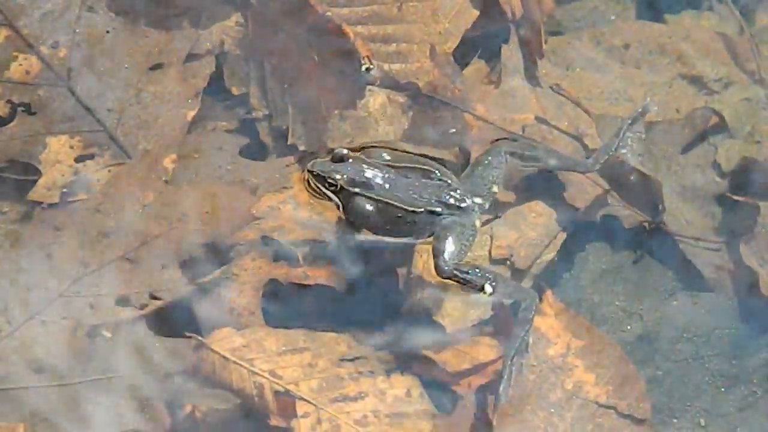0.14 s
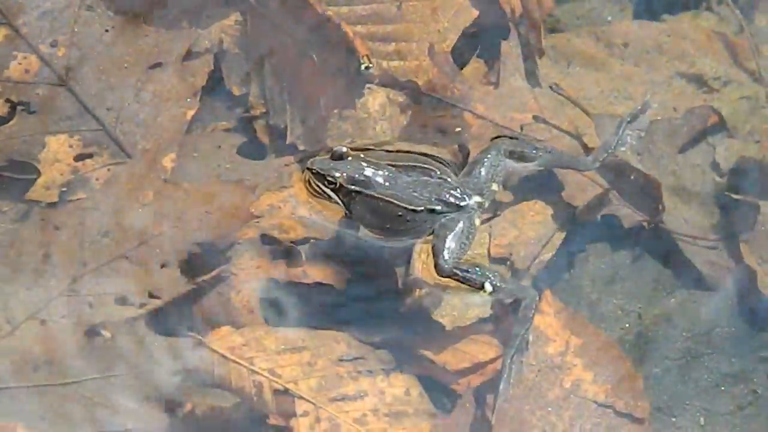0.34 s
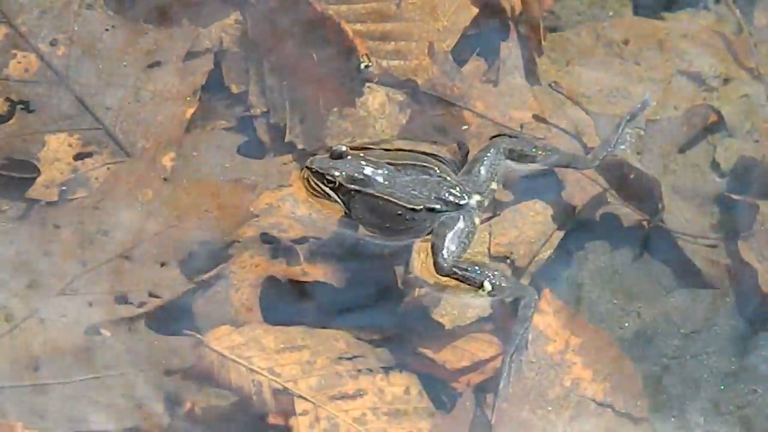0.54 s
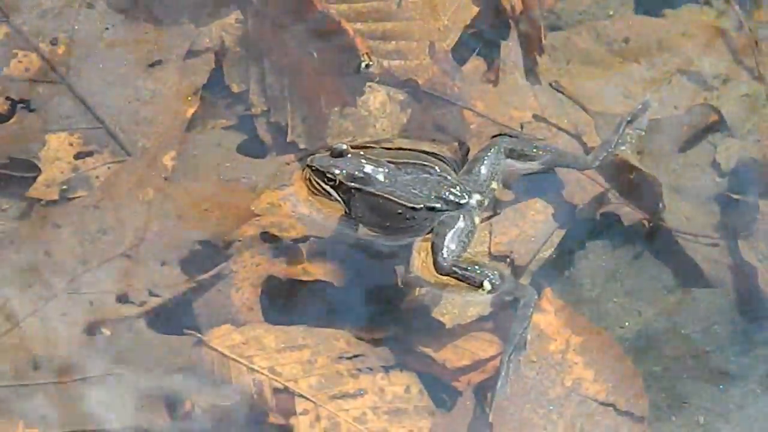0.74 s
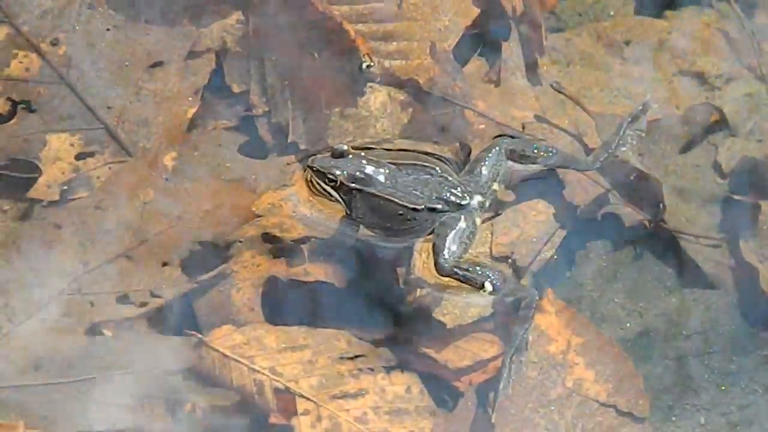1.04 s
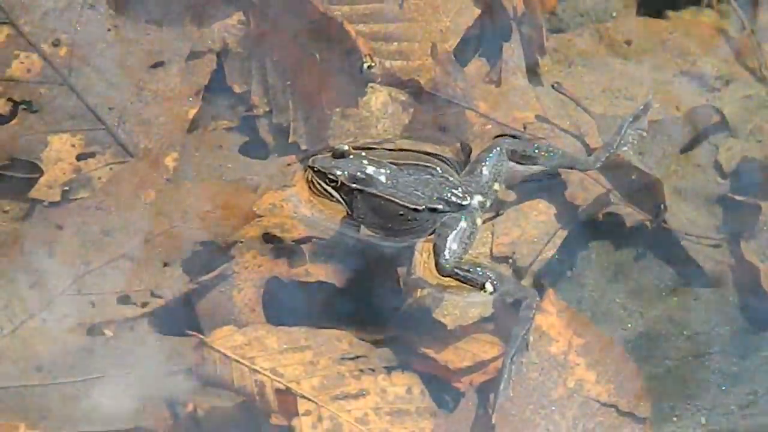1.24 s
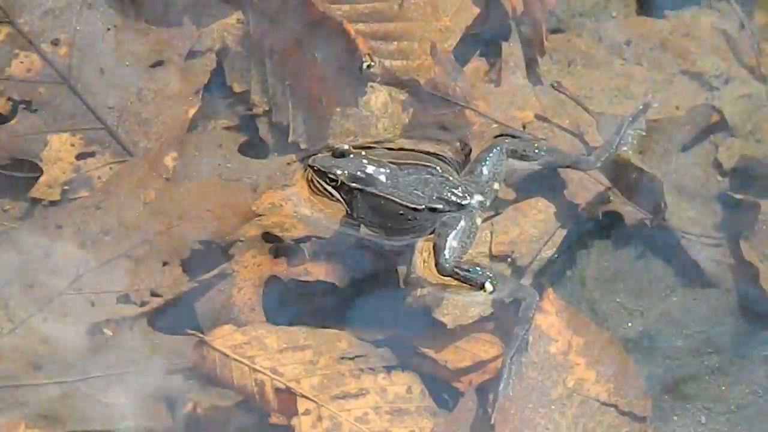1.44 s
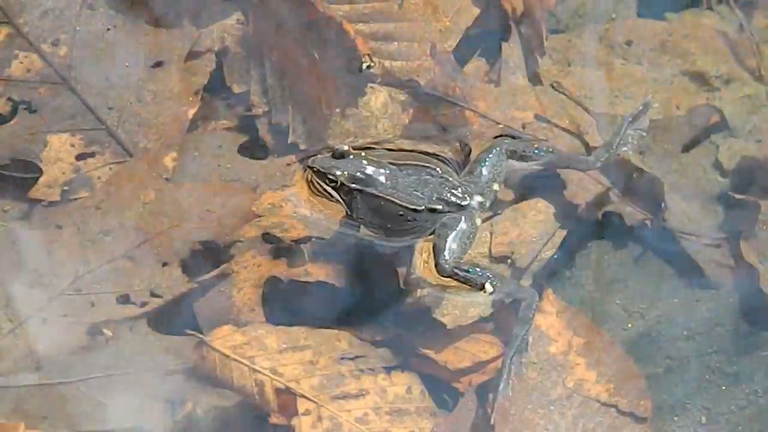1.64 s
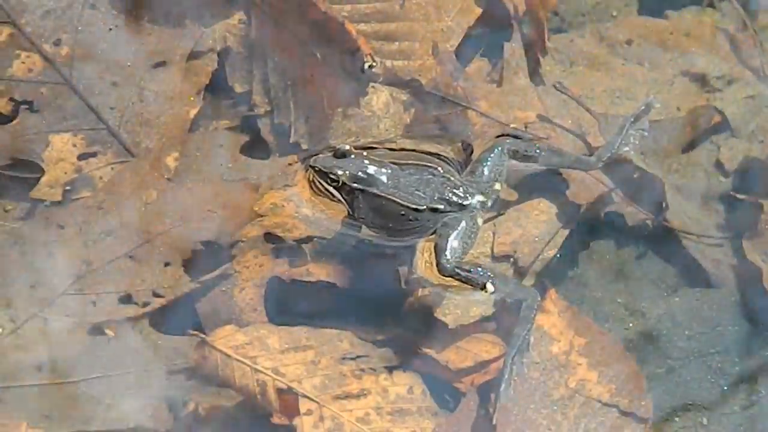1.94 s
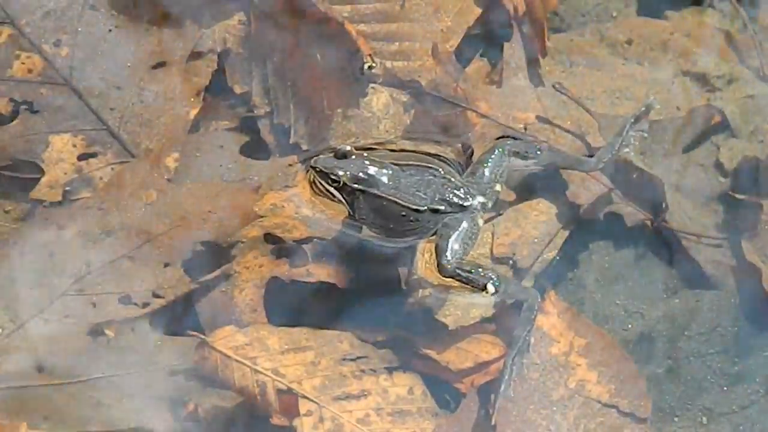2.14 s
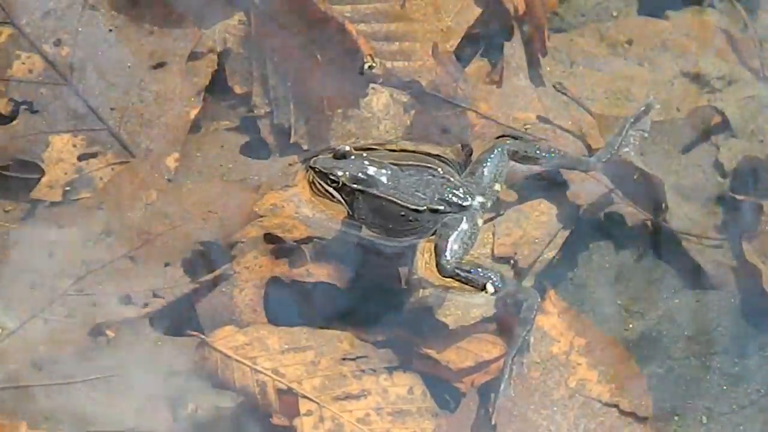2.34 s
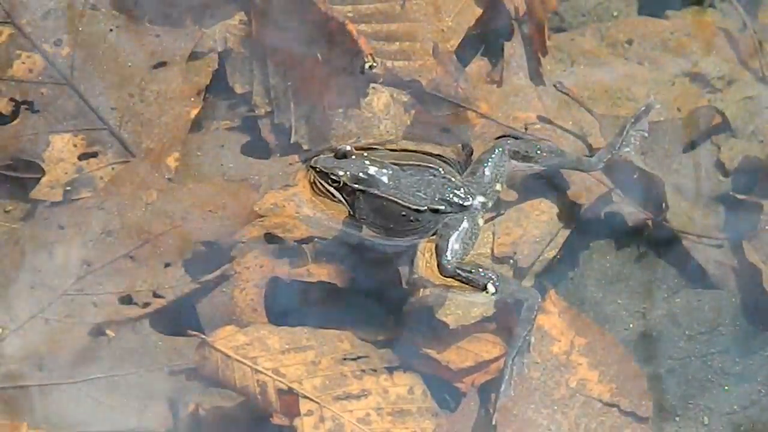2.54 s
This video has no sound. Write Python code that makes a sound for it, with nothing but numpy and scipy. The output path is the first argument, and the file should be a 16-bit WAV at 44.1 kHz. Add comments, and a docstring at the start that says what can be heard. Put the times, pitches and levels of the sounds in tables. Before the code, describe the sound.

Wood frogs quacking in short overlapping notes at a pond, with faint high peeps.

```python
"""A woodland pond. From the start, over a low rumble and faint hiss, wood frogs quack in short overlapping
notes, each a burst of larynx pulses ringing the body and vocal sacs, with a distant chorus behind them.
Spring peepers soon join with thin rising whistles; from about one second in, a few smooth whines slip
between the quacks. Every call echoes off water and trees, and the loudest clip the hotter right channel."""
import sys
import numpy as np
from scipy import signal
from scipy.fft import rfft, irfft, next_fast_len
from scipy.io import wavfile

SR = 44100
rng = np.random.default_rng(int(sys.argv[2]) if len(sys.argv) > 2 else 0)


def wav_out(sig):
    """Save sig, one row per channel (or a flat mono array), as 16-bit PCM at SR to the path in sys.argv[1]."""
    wavfile.write(sys.argv[1], SR, np.round(np.clip(np.atleast_2d(sig).T, -1, 1) * 32767).astype(np.int16))


N = 118629
LEAD = 4410  # samples of pre-roll, for notes already sounding at the start


def gain_of(db):
    return 10 ** (np.asarray(db) / 20)


def unit_rms(x):
    return x / np.sqrt(np.mean(x ** 2) + 1e-20)


def eq_gain(curve, hz):
    """Gain of a (Hz, dB) curve, drawn on a log frequency axis."""
    curve_hz, db = np.transpose(curve)
    return gain_of(np.interp(np.log(hz + 1), np.log(curve_hz + 1), db))


def equalise(x, curve):
    size = next_fast_len(x.shape[-1] + 4096)
    gain = eq_gain(curve, np.fft.rfftfreq(size, 1 / SR))
    return irfft(rfft(x, size) * gain, size)[..., :x.shape[-1]]


def fader(points):
    return gain_of(np.interp(np.arange(N) / SR, *np.transpose(points)))


def place(mix, start, sound, left_db):
    """Pans a sound into a stereo mix that begins LEAD samples early."""
    part = mix[:, max(round(start * SR) + LEAD, 0):][:, :len(sound)]
    part += gain_of([[left_db / 2], [-left_db / 2]]) * sound[:part.shape[1]]


def rumble():
    """Low distant rumble thinning into hiss, mostly alike in both channels."""
    # Each row: frequency in Hz, relative noise density in dB.
    spectrum = [(20, -28.5), (45, -12.5), (80, 1.5), (140, -5), (200, -8), (330, -12.5), (500, -14.5),
                (1500, -29.5), (5000, -28), (7000, -45), (11000, -45), (15800, -52)]
    # Each row: time in seconds, level in dB.
    level_ride = [(0.0, -29), (0.04, -56.5), (0.46, -47), (1.13, -37.5), (1.16, -41.5), (2.03, -43),
                  (2.1, -50), (2.14, -46), (2.63, -43.5), (2.69, -41.5)]
    common, apart = rng.standard_normal((2, N))
    noise = np.array([common, .8 * common + .6 * apart])
    return unit_rms(equalise(noise, spectrum)) * fader(level_ride)


def larynx(size, rate, bend, dice, jitter=.05, uneven_db=1.6):
    """Pulses uneven in timing and strength, their rate sliding up or down through the note."""
    slide = .18 * np.tanh(bend)
    at = (np.arange(60) + .5 + jitter * dice[0, :60]) * SR / rate
    at = np.round(at * (1 - slide * np.minimum(at / size, 1) / 2)).astype(int)
    return np.bincount(np.clip(at, 0, size), gain_of(uneven_db * dice[1, :60]), size + 1)[:size]


def ring(x, hz, width_hz):
    """A resonance applied twice for steep skirts, at unit RMS."""
    radius = np.exp(-np.pi * 1.5 * width_hz / SR)
    poles = [1, -2 * radius * np.cos(2 * np.pi * hz / SR), radius ** 2]
    return unit_rms(signal.lfilter([1, 0, -1], poles, signal.lfilter([1], poles, x)))


def quack(mix, start, core, level_db, rate, sac_hz, body_db, upper_db, treble_db):
    """Larynx pulses, each with a puff of noise, swell and fade as they ring the vocal sacs and body."""
    stretch, rise = 1.35, .3  # note length over its core; share of the note spent rising
    dice = rng.standard_normal((4, 8000))
    quirk = dice[3]
    detune = 1 + .05 * quirk
    t = np.arange(0, stretch * core + .02, 1 / SR)
    progress = np.clip(t / (stretch * core), 0, 1)
    swell = np.sin(np.pi / 2 * np.minimum(progress / rise, (1 - progress) / (1 - rise)))
    caller = larynx(len(t), rate, quirk[6], dice)
    partner = larynx(len(t), 1.6 * rate * detune[7] ** 3, quirk[8], dice[:, 60:])  # a second, faster frog
    pulses = swell * (caller + gain_of(-6.5) * partner)
    puff_shape = signal.lfilter([1], [1, -np.exp(-1 / (.0026 * SR))], pulses)
    puffs = unit_rms(puff_shape * dice[2, :len(t)])
    drive = unit_rms(pulses) + .22 * puffs
    sac = ring(drive, sac_hz, width_hz=274)
    low_sac = gain_of(-9.5) * ring(drive, .82 * sac_hz * detune[0], 274)
    body = gain_of(body_db) * ring(drive, 769.4 * detune[1], 197)
    upper = gain_of(upper_db) * ring(drive, 2486 * detune[2], 1140)
    treble = gain_of(treble_db) * ring(drive + .83 * puffs, 4830 * detune[3], 800)
    rasp = gain_of(-34) * puffs
    voice = unit_rms(sac - low_sac) + body - upper + rasp
    onset = start - (stretch - 1) * core * .4
    left_db = 1.97 * quirk[5]
    level = gain_of(level_db) * np.sqrt(np.mean(swell ** 2))
    place(mix, onset, level * voice, left_db)
    place(mix, onset + .00019, level * treble, left_db + 18.5)  # the bright edge sits far left


def near_frogs():
    """The foreground quacks of the wood frogs."""
    # Each row: start and length of the note's core in seconds, relative level in dB, pulses per second,
    # sac resonance in Hz, then body, upper and treble resonances in dB against the sac.
    notes = [(-0.006, 0.032, -6.5, 190.0, 1717, -11.5, -16, -32),
             (0.051, 0.022, -28.5, 230, 1560, -20, -18, -22.5),
             (0.073, 0.029, -23.0, 177.0, 1600, -11.5, -19, -44),
             (0.168, 0.044, -27, 160.0, 1466, -11, -30, -39),
             (0.212, 0.03, -23.5, 180, 1500, -8.0, -19, -39),
             (0.269, 0.038, -14, 200.0, 1610, -10, -14.5, -31),
             (0.313, 0.031, -20.5, 240, 1410.0, -8, -29.5, -53),
             (0.38, 0.045, -15.5, 200.0, 1390, -10.0, -14.5, -27),
             (0.429, 0.037, -18.5, 220, 1580, -10, -15, -32.5),
             (0.469, 0.03, -16, 159.0, 1455, -11, -15, -36.5),
             (0.499, 0.033, -20, 180.0, 1470, -7.5, -17.0, -31),
             (0.529, 0.024, -13.5, 197.0, 1457, -13.5, -20.5, -28.5),
             (0.553, 0.034, -16.5, 170, 1463, -6.5, -14, -36),
             (0.625, 0.025, -15.0, 158.0, 1557, -12, -23.5, -34),
             (0.65, 0.057, -13.5, 200.0, 1420, -11, -19.5, -31.5),
             (0.72, 0.043, -20.5, 200.0, 1430, -7.5, -13, -42),
             (0.787, 0.034, -15.0, 200.0, 1643, -11, -15.5, -32),
             (0.829, 0.052, -12.5, 200.0, 1550, -8, -15, -35.5),
             (0.926, 0.043, -10.0, 167.0, 1455, -12, -11.5, -36),
             (0.969, 0.056, -15.5, 200.0, 1457, -10.0, -12, -34),
             (1.037, 0.065, -13, 200.0, 1620, -9.0, -13, -23.5),
             (1.116, 0.047, -10, 175.0, 1428, -9.5, -14, -29.5),
             (1.202, 0.037, -12, 200.0, 1234, -7.5, -11.5, -30),
             (1.28, 0.03, -15, 200.0, 1534, -18, -11, -28),
             (1.342, 0.027, -12.5, 200.0, 1304, -8.5, -22, -30),
             (1.389, 0.025, -27.5, 270, 1490, -5, -20, -31),
             (1.418, 0.051, -18.5, 290.0, 1550, -7.0, -13, -26.5),
             (1.495, 0.028, -14.5, 200.0, 1430, -14, -11.5, -29),
             (1.525, 0.047, -13, 188.0, 1443, -9.5, -12.5, -30.5),
             (1.576, 0.056, -13.0, 200.0, 1390.0, -8.5, -15.5, -32.0),
             (1.658, 0.031, -10.0, 210, 1533, -9.5, -15, -33.5),
             (1.701, 0.032, -17, 220, 1535, -7.5, -11, -37),
             (1.73, 0.076, -17, 290, 1370.0, -12, -12.5, -30),
             (1.823, 0.039, -12, 200.0, 1573, -9, -14, -28.5),
             (1.868, 0.024, -13, 190, 1547, -18.5, -14.5, -33),
             (1.901, 0.025, -21.5, 200.0, 1410.0, -16, -15, -31.5),
             (1.931, 0.034, -12.5, 188.0, 1605, -11, -13.5, -31.5),
             (1.976, 0.058, -11.5, 200.0, 1443, -11.5, -12.5, -26),
             (2.025, 0.041, -9.5, 173.0, 1630, -10.5, -8.5, -39),
             (2.072, 0.045, -17.5, 130, 1460.0, -10.0, -22.5, -30.5),
             (2.134, 0.039, -18.5, 171.0, 1564, -13, -12.5, -24),
             (2.174, 0.037, -22, 200.0, 1370.0, -5.5, -28, -40),
             (2.211, 0.037, -23.5, 99, 1430.0, -11, -13, -31),
             (2.252, 0.054, -14.0, 171.0, 1470.0, -10, -18, -31),
             (2.322, 0.04, -15.0, 248.0, 1530, -10.0, -10.5, -28.0),
             (2.361, 0.042, -13.5, 150.0, 1493, -7, -18.5, -29),
             (2.406, 0.045, -10.5, 167.0, 1510, -12, -14.5, -34.5),
             (2.467, 0.062, -28, 130, 1490, -8, -25, -38.5),
             (2.502, 0.042, -22.5, 169.0, 1505, -10.5, -20, -37),
             (2.563, 0.041, -19, 210, 1470.0, -8, -14.5, -29),
             (2.613, 0.046, -20, 154.0, 1460, -4.5, -8.5, -32.0),
             (2.667, 0.023, -11.5, 160, 1510, -10, -15.0, -28)]
    mix = np.zeros((2, N + LEAD))
    for note in notes:
        quack(mix, *note)
    return mix[:, LEAD:]


def far_frogs(quacks_per_s=48):
    """Many wood frogs farther off, quacking at random in a chorus that swells and ebbs."""
    # Each row: time in seconds, chorus gain in dB.
    level_ride = [(0, -2.5), (.15, -3.5), (.35, -1.5), (.6, 2), (.9, 4), (1.2, 6.5), (1.5, 4), (1.8, 3),
                  (2.1, -1), (2.3, 6), (2.5, -10), (2.69, 5)]
    mix = np.zeros((2, N + LEAD))
    for start in np.arange(-.05, N / SR, 1 / quacks_per_s):
        late, long, loud, fast, high = rng.standard_normal(5)
        quack(mix, start + .03 * late, core=.04 + .008 * np.tanh(long), level_db=-28 + 4 * np.tanh(loud),
              rate=190 + 25 * fast, sac_hz=1450 + 110 * high, body_db=-7, upper_db=-13, treble_db=-36)
    return mix[:, LEAD:] * fader(level_ride)


def bank_echoes(calls, t60_s=.08, centre_db=-7.5, sides_db=-11):
    """Scattered echoes off water and trees; every 60 ms of calling gets those of another spot."""
    t, hop = np.arange(0, .2, 1 / SR), 2646
    decay = gain_of(-60 * t / t60_s) * (t > .001)
    window = np.sqrt(signal.get_window("hann", 2 * hop))
    calls = np.pad(calls, ((0, 0), (hop, 2 * hop)))
    wet = np.zeros((2, N + 9 * hop))
    for at in range(0, N + hop, hop):
        taps = rng.choice([-1., 1.], (3, len(t))) * (rng.random((3, len(t))) < .05) * decay
        taps /= np.linalg.norm(taps, axis=1)[:, None]
        response = gain_of(centre_db) * taps[2] + gain_of(sides_db) * taps[:2]
        echo = signal.fftconvolve(calls[:, at:at + 2 * hop] * window, response, axes=1)
        wet[:, at:at + echo.shape[1]] += echo
    return wet[:, hop:hop + N]


def peepers():
    """Pure whistles, nearly all sliding up, that fade in, hold and stop short."""
    # Each row: start and length in seconds, first and last pitch in Hz, relative level in dB,
    # left over right in dB.
    peeps = [(0.092, 0.089, 2800, 3120, -48, -3.5), (0.239, 0.1, 2890, 3060, -43, 0.5),
             (0.396, 0.13, 2567, 2880, -34, 4), (0.632, 0.08, 2700, 2820, -37.5, 4.5),
             (0.788, .10, 2855, 3074, -35, -4), (0.873, 0.098, 3120, 3320, -37, 1.5),
             (1.098, 0.11, 2940, 3050, -35.5, 4), (1.213, .12, 2567, 2864, -31.5, -0.5),
             (1.503, 0.17, 2830, 3156, -37, 12), (1.802, .028, 2440, 2440, -22, 5),
             (1.842, 0.13, 2550, 2830, -32, -3), (1.874, 0.06, 2960, 3080, -40.5, 9),
             (1.972, .12, 2524, 2817, -33, -1.5), (2.5, .12, 2330, 2560, -38.5, -1.5)]
    mix = np.zeros((2, N + LEAD))
    for start, length, from_hz, to_hz, level_db, left_db in peeps:
        progress = np.arange(0, length, 1 / SR) / length
        hz = from_hz + (to_hz - from_hz) * progress
        tone = np.sqrt(2) * np.sin(2 * np.pi * (np.cumsum(hz) / SR + rng.random()))
        envelope = np.minimum(1, np.minimum(progress / .3, (1 - progress) / .04))
        place(mix, start, gain_of(level_db) * envelope * tone, left_db)
    return mix[:, LEAD:]


def whines():
    """Smooth calls of seven harmonics on a bending pitch, dead centre."""
    # Each row: start and length in seconds, first, middle and last pitch in Hz, relative level in dB.
    calls = [(.955, 0.073, 422.7, 396, 354, -17.5), (1.205, 0.059, 435.6, 407.3, 360, -20),
             (1.283, 0.075, 369.8, 457.6, 421, -16), (1.934, 0.031, 296, 309.7, 320, -16.5),
             (2.255, 0.067, 328.5, 391, 412, -19.5), (2.401, 0.061, 415.4, 442, 503, -16)]
    # Each row: frequency in Hz, weight in dB of a harmonic that falls there.
    timbre = [(400, -24), (800, -5), (1300, -3.5), (1800, 4.5), (2300, -17.5), (3000, -21.5)]
    mix = np.zeros((2, N + LEAD))
    for start, length, *pitches, level_db in calls:
        progress = np.arange(0, length, 1 / SR) / length
        hz = np.polyval(np.polyfit([0, .5, 1], pitches, 2), progress)
        phase = 2 * np.pi * np.cumsum(hz) / SR
        tone = sum(eq_gain(timbre, k * hz) * np.cos(k * phase) for k in range(1, 8))
        envelope = np.sin(np.pi * progress) ** 1.1
        place(mix, start, gain_of(level_db) * envelope * unit_rms(tone), left_db=0)
    return mix[:, LEAD:]


def scene():
    """All the calls and their echoes over the bed of rumble."""
    # Microphone colour on the quacks. Each row: frequency in Hz, gain in dB.
    mic_eq = [(200, -15.5), (450, -6.5), (600, 1), (2000, 0.5), (3050, -4), (3400, -9.5), (4300, -6),
              (5200, -5), (5600, -8), (8000, -18), (15800, -25)]
    calls = equalise(near_frogs() + far_frogs(), mic_eq) + whines() + peepers()
    return gain_of(-2.5) * (calls + bank_echoes(calls)) + rumble()


def record(dry, right_db=2.3, ceiling=1.02, knee=16, cutoff_hz=15800):
    """The right channel runs hotter and clips on peaks; a steep low-pass then trims the top."""
    hot = dry * gain_of([[-right_db / 2], [right_db / 2]])
    clipped = hot / (1 + abs(hot / ceiling) ** knee) ** (1 / knee)
    lowpass = signal.firwin(511, cutoff_hz, window=("kaiser", 9), fs=SR)
    return signal.oaconvolve(clipped, lowpass[None], "same")


dry = scene()
out = record(dry)
wav_out(out)
```